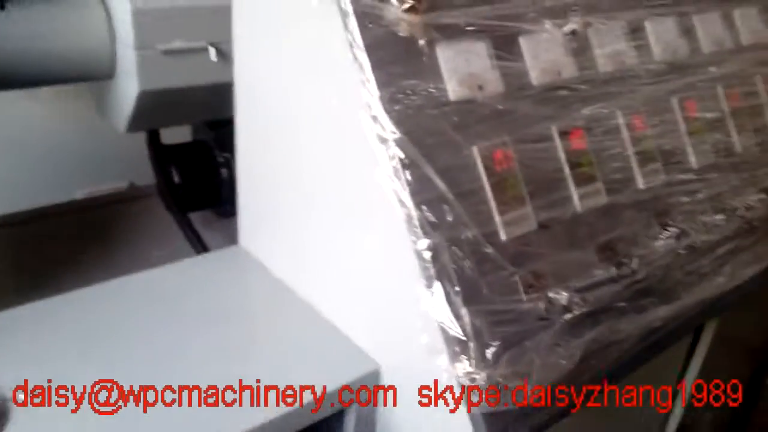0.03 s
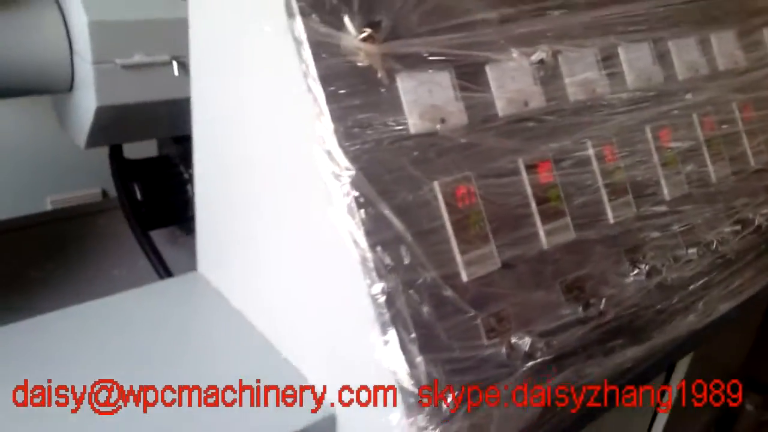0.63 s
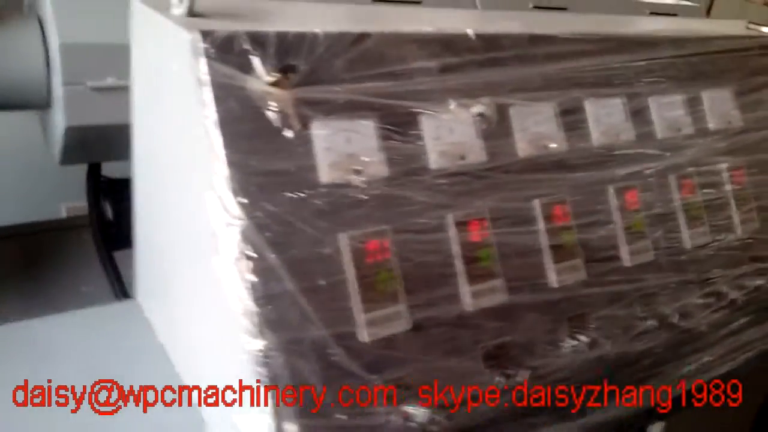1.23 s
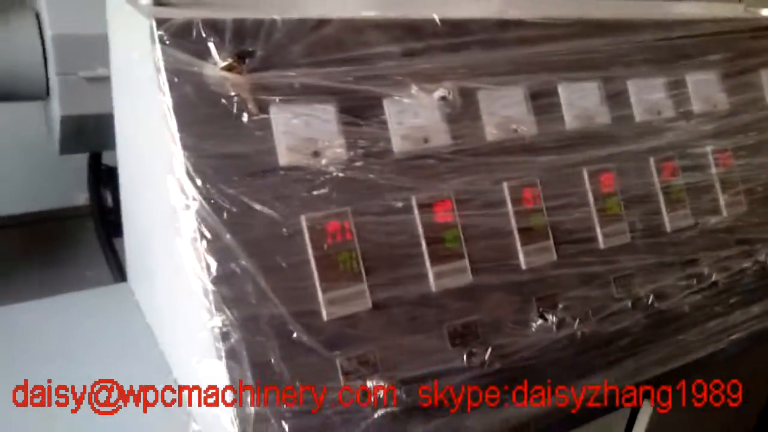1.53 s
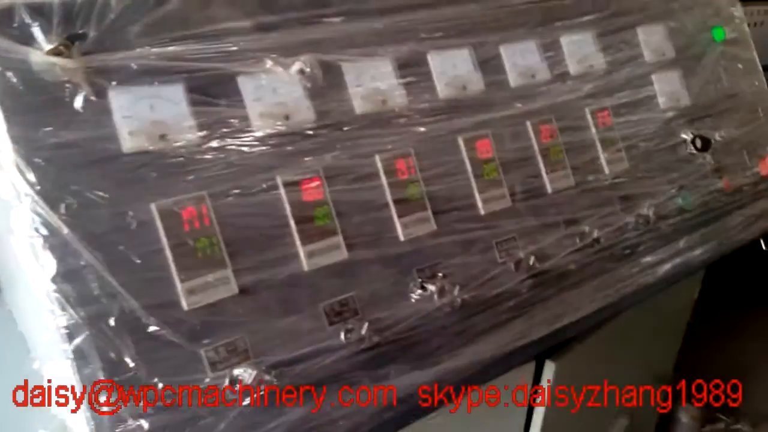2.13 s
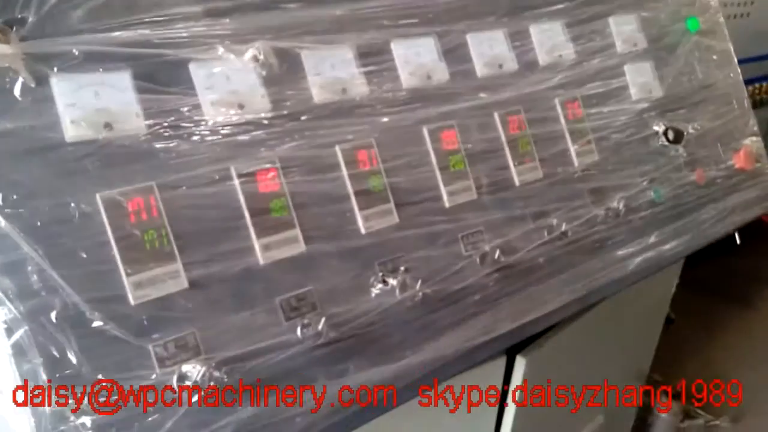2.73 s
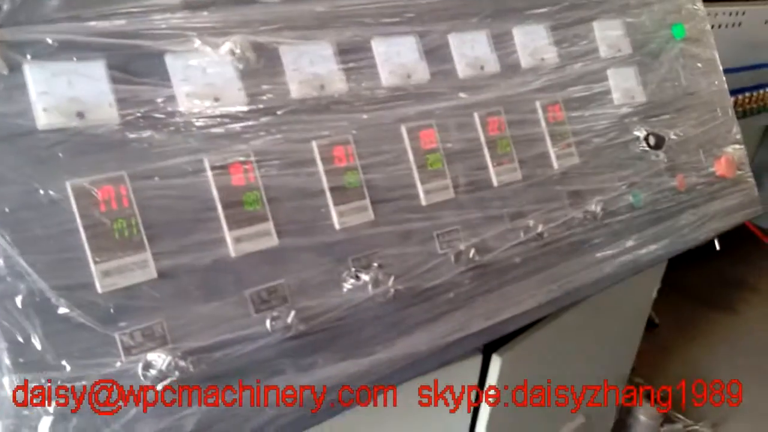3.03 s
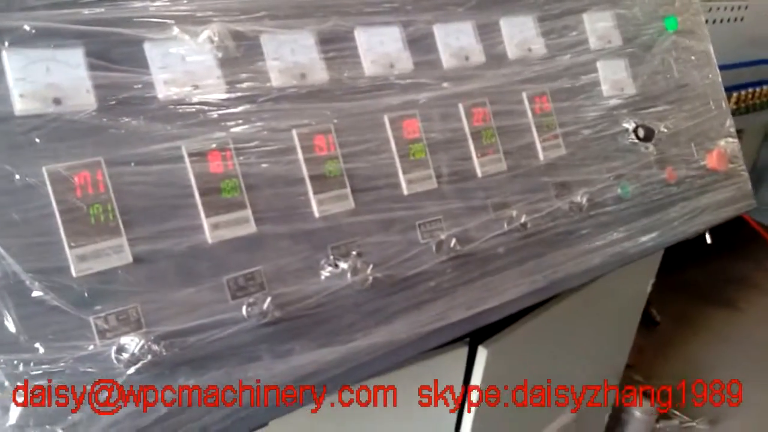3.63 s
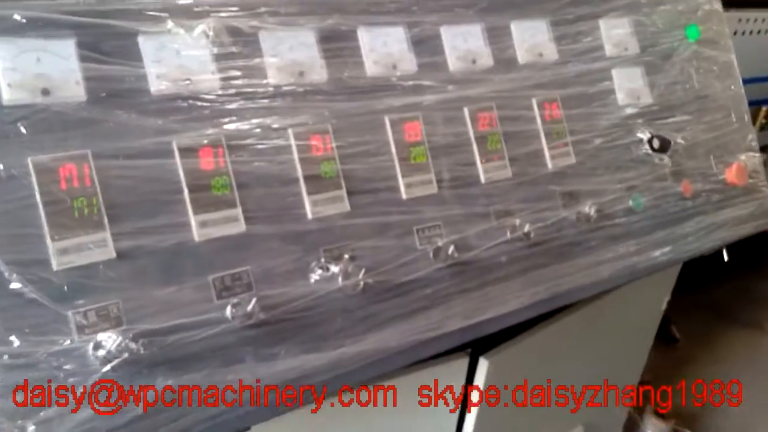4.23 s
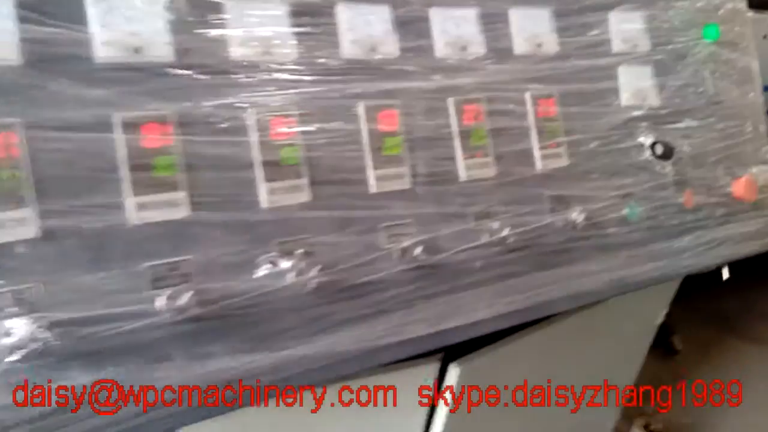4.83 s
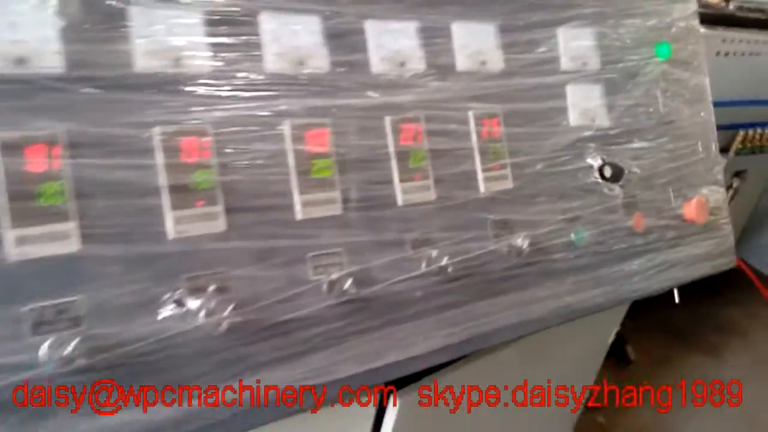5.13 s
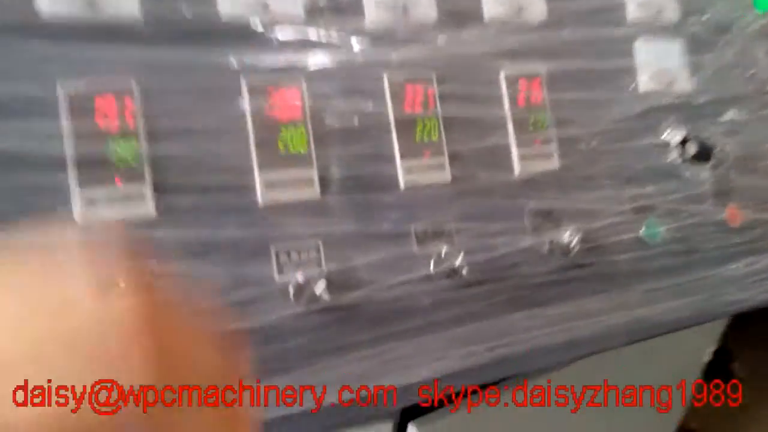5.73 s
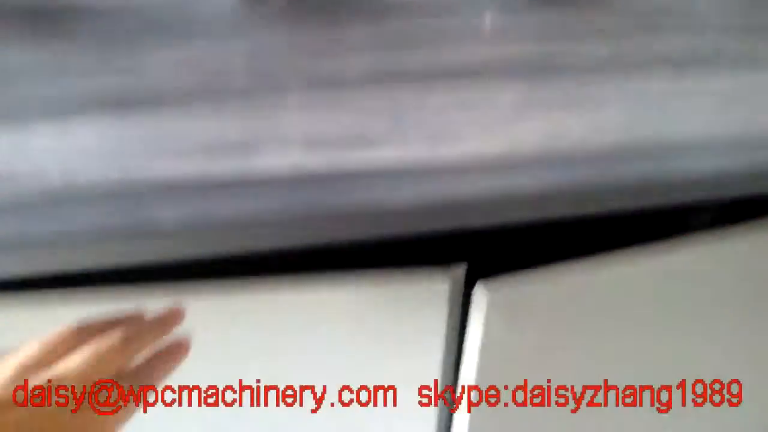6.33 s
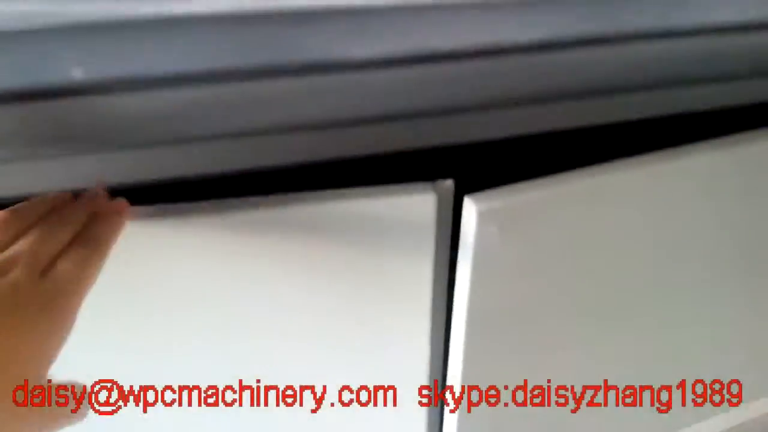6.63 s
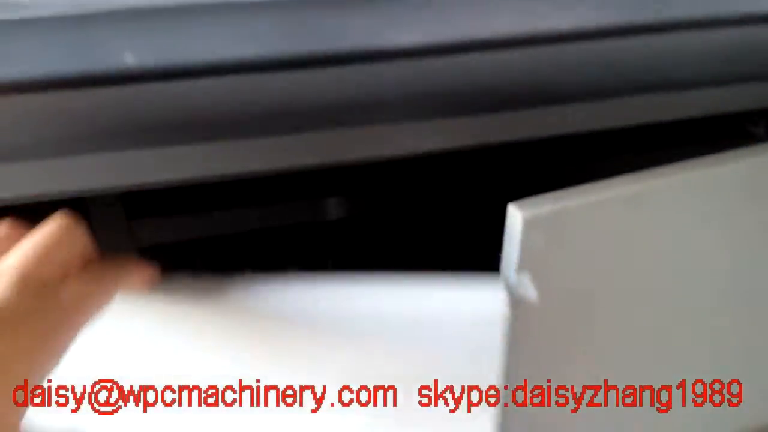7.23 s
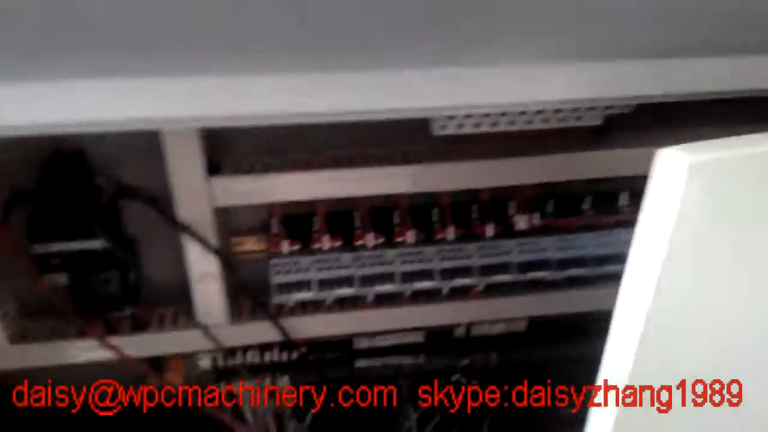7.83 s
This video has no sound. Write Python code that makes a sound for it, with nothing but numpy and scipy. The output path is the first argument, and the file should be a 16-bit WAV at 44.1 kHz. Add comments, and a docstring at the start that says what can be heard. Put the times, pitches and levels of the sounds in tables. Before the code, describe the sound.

A loud, high, buzzing whine of running factory machinery over fan hum, with a few clacks, a metal door opening and three brief dropouts.

```python
"""Inverter whine in a factory hall.

A hand-held microphone moves along the control cabinet of a running machine. Pulse-width modulation makes
the motor iron sing in sidebands around the switching frequency, which swell and fade in standing waves.
Behind them lie hall noise, rushing air, fan tones and hum. A few clacks, knocks and rustles pass, and a
sheet-metal door is pulled open. The sound is limited to the voice band and drops out three times."""
import sys
import numpy as np
from scipy import signal
from scipy.fft import rfft, irfft, next_fast_len
from scipy.io import wavfile

SR = 44100
rng = np.random.default_rng(int(sys.argv[2]) if len(sys.argv) > 2 else 0)


def log_audio(samples):
    """Write samples as a 16-bit WAV file to the path given in sys.argv[1]."""
    # one column per channel
    frames = np.atleast_2d(samples).T
    # limit to full scale, then quantise
    limited = np.clip(frames, -1, 1)
    pcm = np.round(limited * 32767).astype(np.int16)
    wavfile.write(sys.argv[1], SR, pcm)


N = 348390
TIME = np.arange(N) / SR
DRIVE_HZ, SWITCHING_HZ = 19.42, 3999.4
BLADE_HZ, DRONE_HZ, PANEL_HZ, DOOR_HZ = 814.2, 197.7, 317, 88
VOICE_BAND_HZ, RECORDER_RATE_HZ, CUTOFF_HZ = 7127, 16000, 15800

# broadband noise along the path: (time [s], air rush [dB], hall [dB], relative motor hiss [dB])
NOISE_LEVELS = [(0, -59, -27.5, -21), (1, -60, -29.5, -22.5), (2, -58, -30.5, -24),
                (3.4, -46.5, -31.5, -26.5), (4.3, -44.5, -31, -24.5), (4.8, -53.5, -31.5, -24.5),
                (5.55, -44, -33, -24), (5.85, -38, -29.5, -24.5), (6.3, -37.5, -32, -23.5),
                (7.1, -36.5, -30.5, -21.5), (7.9, -39, -28.5, -20.5)]
# noise spectra: (frequency [Hz], relative spectral density [dB])
HALL_SPECTRUM = [(25, -36), (50, -33), (70, -19), (90, -16), (140, -5.5), (260, -6), (500, -3.5), (800, -1),
                 (1150, -3.5), (1650, 2.5), (2050, -1.5), (2500, 3), (3000, 0.5), (7000, -21)]
RUSH_SPECTRUM = [(50, -31), (110, -10), (220, 1.5), (420, 4), (650, 1.5), (1100, -3), (2500, -27),
                 (6000, -40)]
RUSTLE_SPECTRUM = [(1500, -30.5), (3500, 1.5), (5000, 7), (6600, 0), (7500, -12.5)]
CLACK_SPECTRUM = [(100, -33), (310, -13.5), (470, -14), (850, -2.5), (1150, -6), (2100, -5), (2500, 0),
                  (3300, 0), (4700, 4.5), (5500, -2), (6500, -8.5), (7500, -23.5)]
HISS_SPECTRUM = [(2000, -40.5), (3000, -18.5), (3500, -4.5), (3980, 3.5), (4400, -5), (4800, -7.5),
                 (5150, -11.5), (5400, -17.5), (6000, -19), (6700, -23.5), (7100, -40.5), (7400, -54.5)]
FAINT_SIDEBAND_SPECTRUM = [(2600, -33.5), (3100, -9.5), (3500, -6), (3950, 4), (4400, -0.5), (4800, -5.5),
                           (5400, -11.5), (6500, -40.5)]
# blade tone, fading in two dead spots of the hall: (time [s], relative level [dB])
BLADE_LEVEL = [(0.0, -47.5), (0.18, -37.5), (0.7, -35.5), (0.94, -53), (1.12, -42.3), (2.02, -39),
               (2.36, -57), (3.44, -42.5), (3.6, -48), (3.84, -43), (5.98, -39.5), (6.08, -46), (7.88, -40)]
# its overtones: (multiple of the blade rate, level [dB])
BLADE_OVERTONES = [(2, -45.5), (3, -43.5)]
# drone of a nearby motor: (time [s], relative level [dB])
DRONE_LEVEL = [(0.0, -43.5), (5.4, -50.5), (6.58, -45.5), (7.88, -46)]
# hum of motors and small fans: (frequency [Hz], level [dB])
HUM_TONES = [(98, -62.5), (116.8, -53), (392, -54.5), (1084, -54), (1163, -53), (2530, -51.5),
             (2598, -43.5)]
# handling rustles: (time [s], peak level [dB], half the decay time constant [s])
RUSTLES = [(2.381, -28, 0.016), (2.727, -33.5, 0.061), (3.132, -31, 0.044), (4.66, -37.5, 0.023),
           (5.423, -31, 0.014), (5.868, -31.5, 0.059), (7.808, -36, 0.043)]
# dull knocks on a panel: (time [s], level [dB], t60 [s])
KNOCKS = [(0.054, -26, 0.13), (4.365, -27, 0.15), (5.466, -23, 0.18), (5.99, -19, 0.091)]
# clacks: (time [s], level [dB], time before decay [s], tilt [dB per octave])
CLACKS = [(0.046, -12.5, 0.0096, 2), (4.356, -14.5, 0.0072, 0), (5.459, -11.5, 0.0034, 3.5),
          (5.694, -14.5, 0.0083, -0.5), (6.908, -13, 0.0085, 0.5)]
# jerks of the door catch: (time [s], relative level [dB])
CATCH_JERKS = [(6.9021, 7), (6.9064, 3), (6.909, 6), (6.913, -7), (6.9207, -9)]
# modes of the catch and door sheet: (frequency [Hz], relative level [dB])
DOOR_MODES = [(590, -33), (1170, -30.5), (1700, -27.5), (1790, -26), (2480, -36), (2890, -27), (3250, -34),
              (4580, -19), (4760, -19), (4960, -19), (5090, -16), (5230, -21.5), (5540, -20), (5650, -23)]
# wobble of the freed door: (time [s], level [dB], t60 [s])
DOOR_WOBBLE = (6.945, -27.5, .3)
# the hand moves, slows at the dials, then reaches for the door: (time [s], relative microphone speed)
MICROPHONE_PACE = [(0, 1.0), (2.0, 1.1), (2.5, .4), (4.7, 0.4), (5.4, 1.3), (6.7, 1.5), (7.0, .6)]
# joint level of the four strong sidebands: (time [s], level [dB])
WHINE_LEVEL = [(0.0, -14.5), (0.38, -12.5), (0.56, -19.5), (1.34, -13), (1.44, -18.5), (1.84, -13),
               (1.96, -18.5), (2.26, -14.5), (3.24, -21.2), (3.36, -26), (3.56, -12), (3.62, -23),
               (3.76, -13.5), (4.12, -17.5), (5.64, -18.5), (5.76, -14), (5.92, -22.5), (6.18, -17.5),
               (6.36, -21.5), (6.56, -13.5), (6.66, -21), (6.86, -12), (7.52, -15), (7.88, -10.5)]
# strong sidebands by name: offset from the switching frequency [drive frequencies]
STRONG_ORDERS = {"lowest": -5, "lower": -1, "upper": 1, "highest": 5}
# their balance, by name: relative level [dB]
STRONG_BALANCE = {"lowest": -7, "lower": -4.5, "upper": 0, "highest": -5}
# loud and dead spots of their standing waves, by name: (time [s], gain [dB], half width [s])
STANDING_WAVE_SPOTS = {"lowest": [(0.0, 11, .15), (5.3, -13.5, 0.2), (6.15, 9.5, .2), (7.1, 6, .4)],
                       "lower": [(1.3, 8.5, 0.1), (2.5, 2, 0.56), (7.15, 10.5, 0.69)],
                       "upper": [(0.45, 9.5, 0.39), (2.85, -17, 0.37), (4.1, -5, 0.32), (6.9, -5.5, .8)],
                       "highest": [(2.8, 5.5, 0.76), (4.2, 8.5, .6), (7.7, 3, 0.25)]}
# weak sidebands: (offset from the switching frequency [drive frequencies], relative level [dB])
WEAK_SIDEBANDS = [(-37, -43), (-35, -50.5), (-31, -43), (-29, -49.5), (-25, -40), (-23, -39.5),
                  (-19, -41.5), (-17, -36), (-13, -39.5), (-11, -32), (-7, -41.5), (-3, -30), (3, -30.5),
                  (7, -36), (11, -35.5), (13, -48), (17, -45), (18, -41)]
# silences: (start [s], end [s], edge length [s])
DROPOUTS = [(1.535, 1.6618, .0001), (3.5204, 3.646, .0001), (5.056, 5.181, .002)]


def from_db(db):
    """Amplitude grows tenfold with every 20 dB."""
    return 10 ** (np.asarray(db) / 20)


def unit_power(x):
    """Division by the root mean square gives a signal unit power."""
    return x / np.sqrt(np.mean(np.abs(x) ** 2) + 1e-20)


def in_time(rows):
    """Linear interpolation gives each column of a timed table at every sample."""
    times, *columns = np.transpose(rows)
    return [np.interp(TIME, times, column) for column in columns]


def drift(rate_hz):
    """Low-pass filtered noise wanders slowly, at unit power and one value per 100 samples."""
    pole = np.exp(-2 * np.pi * rate_hz * 100 / SR)
    white = rng.standard_normal(N // 100 + 2002)
    return unit_power(signal.lfilter([1], [1, -2 * pole, pole * pole], white)[2000:])


def multipath_gain(scatter, rate_hz):
    """Interference: a steady path adds to reflections that change as the microphone covers distance."""
    field = unit_power(1 + scatter * (drift(rate_hz) + 1j * drift(rate_hz)))
    times = np.linspace(0, TIME[-1], len(field))
    travelled = np.cumsum(np.interp(times, *np.transpose(MICROPHONE_PACE)))
    at_microphone = np.interp(travelled / travelled[-1], np.linspace(0, 1, len(field)), field)
    return np.interp(TIME, times, at_microphone)


def tone(hz, scatter, rate_hz, spread_cycles=1):
    """Multipath fading varies the amplitude and phase of a unit-power tone with a random starting phase."""
    paths = multipath_gain(scatter, rate_hz)
    phase = 2 * np.pi * (hz * TIME + spread_cycles * rng.random())
    return np.sqrt(2) * (paths * np.exp(1j * phase)).real


def coloured(spectrum, tilt_db=0, spiky_db=0, half_width_hz=None):
    """Spectral shaping colours unit-power noise; it can be grainy, or gathered on the odd sidebands."""
    hz, level_db = np.transpose(spectrum)
    size = next_fast_len(N, True)
    bin_hz = np.maximum(np.arange(size // 2 + 1) * SR / size, 1)
    shape = from_db(np.interp(np.log2(bin_hz), np.log2(hz), level_db + tilt_db * np.log2(hz)))
    shape *= bin_hz < RECORDER_RATE_HZ / 2
    if half_width_hz:
        off_line_hz = (bin_hz - SWITCHING_HZ) % (2 * DRIVE_HZ) - DRIVE_HZ
        shape /= 1 + (off_line_hz / half_width_hz) ** 2
    grains = rng.standard_normal(size)
    if spiky_db:
        grains *= from_db(spiky_db * np.minimum(rng.exponential(1, size), 5))
    return unit_power(irfft(rfft(grains) * shape, size)[:N])


def ring(impulses, hz, t60):
    """A damped resonator answers each impulse with an exponentially decaying sine."""
    radius, angle = from_db(-60 / (t60 * SR)), 2 * np.pi * hz / SR
    return signal.lfilter([0, np.sin(angle)], [1, -2 * radius * np.cos(angle), radius ** 2],
                          impulses + 1e-18)


def thud(hz, start, level_db, t60, rise_s=0.0087):
    """A soft push builds up one low mode, which damping then drains."""
    age = np.maximum(TIME - start, 0)
    envelope = (1 - np.exp(-age / rise_s)) * from_db(level_db - 60 * age / t60)
    return envelope * np.sin(2 * np.pi * hz * age)


def air():
    """Broadband noise of the hall and of air rushing at the cabinet's foot varies with position."""
    rush_db, hall_db, _ = in_time(NOISE_LEVELS)
    return from_db(rush_db) * coloured(RUSH_SPECTRUM) + from_db(hall_db) * coloured(HALL_SPECTRUM)


def fans_and_motors():
    """Periodic motion radiates tones: harmonics of the cooling fan's blade rate, and motor hum."""
    (blade_db,), (drone_db,) = in_time(BLADE_LEVEL), in_time(DRONE_LEVEL)
    blades = from_db(blade_db + 2.86) * tone(BLADE_HZ, scatter=0.23, rate_hz=8.9)
    shallow_fade = from_db(0.3 * (blade_db - blade_db.mean()))
    overtones = sum(from_db(db) * tone(np.round(multiple) * BLADE_HZ, scatter=1.0, rate_hz=9.7)
                    for multiple, db in BLADE_OVERTONES)
    drone = from_db(drone_db - 1.2) * tone(DRONE_HZ, scatter=0.2, rate_hz=2.4)
    hum = sum(from_db(db) * tone(hz, scatter=0.82, rate_hz=4.1) for hz, db in HUM_TONES)
    return blades + shallow_fade * overtones + drone + hum


def rustles():
    """Handling makes grainy noise whose amplitude rises and falls exponentially."""
    envelope = sum(from_db(db) * np.exp(-np.abs(TIME - peak) / (2 * half)) for peak, db, half in RUSTLES)
    return envelope * coloured(RUSTLE_SPECTRUM, spiky_db=3.5)


def knocks():
    """The knocked panel and the freed door each vibrate freely in one low mode."""
    return sum(thud(PANEL_HZ, *knock) for knock in KNOCKS) + thud(DOOR_HZ, *DOOR_WOBBLE)


def clacks(rise_s=0.0015, crack_t60=0.1, tail_t60=0.23, tail_share=0.55):
    """A short run of tiny impacts gives a burst of noise, prolonged by the hall's reverberation."""
    out = np.zeros(N)
    for start, level_db, length, tilt_db in CLACKS:
        age = TIME - start
        attack = np.clip(age / rise_s, 0, 1)
        fall = -np.log(1000) * np.clip(age - length, 0, 1)
        decay = (1 - tail_share) * np.exp(fall / crack_t60) + tail_share * np.exp(fall / tail_t60)
        out += from_db(level_db) * attack * decay * coloured(CLACK_SPECTRUM, tilt_db, spiky_db=4.0)
    return out


def door_catch(t60=0.058):
    """Impulse excitation: each jerk of the slipping catch strikes the door's modes with random signs."""
    jerk_times, jerk_db = np.transpose(CATCH_JERKS)
    onsets = (jerk_times * SR).astype(int)
    out = np.zeros(N)
    for hz, mode_db in DOOR_MODES:
        jerks = np.zeros(N)
        jerks[onsets] = from_db(jerk_db + mode_db) * rng.choice([-1, 1], len(onsets))
        out += ring(jerks, hz, t60)
    return out


def motor_hiss(throb_depth=0.049, hiss_db=-1.0, faint_db=-4.0):
    """Magnetic pull modulates the amplitude of a hiss and of countless faint sidebands."""
    _, _, level_db = in_time(NOISE_LEVELS)
    pull = 1 + throb_depth * np.cos(2 * np.pi * 4 * DRIVE_HZ * TIME)
    sidebands = from_db(faint_db) * coloured(FAINT_SIDEBAND_SPECTRUM, half_width_hz=1.8)
    hiss = from_db(hiss_db) * coloured(HISS_SPECTRUM)
    return from_db(level_db) * pull * (hiss + sidebands)


def standing_wave_db(name):
    """A sideband swells near an antinode of its standing wave and dips near a node."""
    return sum(db * np.exp(-((TIME - centre) / half_width) ** 2)
               for centre, db, half_width in STANDING_WAVE_SPOTS[name])


def inverter_whine(spread_cycles=0.4, shielding_share=0.8):
    """Pulse-width modulation drives the motor iron at sidebands that, partly in step, beat into a buzz."""
    whine_db, = in_time(WHINE_LEVEL)
    strong, power = 0, 0
    for name, order in STRONG_ORDERS.items():
        paths = multipath_gain(scatter=0.41, rate_hz=2.7)
        gain = from_db(STRONG_BALANCE[name] + standing_wave_db(name)) * paths
        cycles = (SWITCHING_HZ + order * DRIVE_HZ) * TIME + spread_cycles * rng.random()
        strong += gain * np.exp(2j * np.pi * cycles)
        power += np.abs(gain) ** 2
    # standing waves only shift the balance: the four sidebands share the level of the whine
    strong = from_db(whine_db) * np.sqrt(2 / power) * strong.real
    weak = 0
    for order, db in WEAK_SIDEBANDS:
        hz = SWITCHING_HZ + np.round(order) * DRIVE_HZ
        weak += from_db(db + 0.6) * tone(hz, scatter=0.5, rate_hz=2.4, spread_cycles=0.85)
    # the weak sidebands rise and fall with the hiss as the cabinet shields the motor more or less
    _, _, hiss_db = in_time(NOISE_LEVELS)
    return strong + from_db(shielding_share * (hiss_db - hiss_db.mean())) * weak


def scene():
    """Superposition: the pressures of all sources add at one microphone."""
    continuous = inverter_whine() + motor_hiss() + fans_and_motors() + air()
    return (continuous + clacks() + rustles() + door_catch() + knocks())[None]


def record(dry, image_db=-21, image_hz=9100):
    """A voice-band recorder clips, limits the bandwidth, leaks a faint spectral image and drops out."""
    clipped = np.clip(dry, -0.85, 0.85)
    narrow = signal.sosfilt(signal.ellip(10, 0.3, 80, VOICE_BAND_HZ, fs=SR, output="sos"), clipped)
    # the top of the band is mirrored around half the recorder's sampling rate
    mirrored = narrow * 2 * np.cos(2 * np.pi * RECORDER_RATE_HZ * TIME)
    image_band = signal.butter(4, [image_hz - 450, image_hz + 450], "band", fs=SR, output="sos")
    image = from_db(image_db) * signal.sosfilt(image_band, mirrored)
    gate = np.clip((TIME[-1] - TIME) / 0.002, 0, 1)   # closing fade
    for start, end, edge in DROPOUTS:
        gate *= np.clip(np.maximum(start - TIME, TIME - end) / edge, 0, 1)
    lowpass = signal.ellip(8, 0.1, 70, CUTOFF_HZ, fs=SR, output="sos")
    return signal.sosfilt(lowpass, (narrow + image) * gate)


dry = scene()
out = record(dry)
log_audio(out)
```